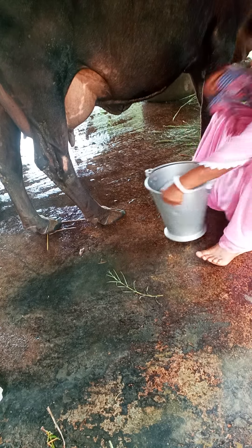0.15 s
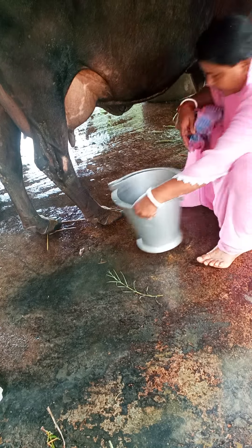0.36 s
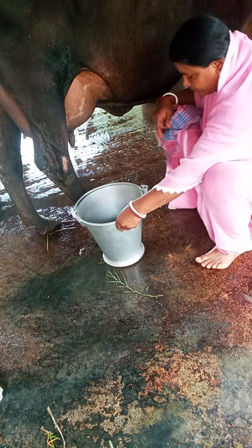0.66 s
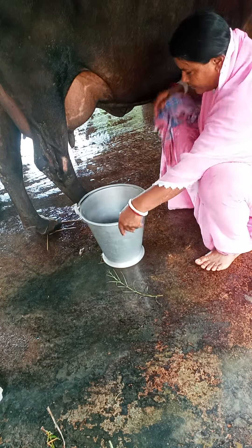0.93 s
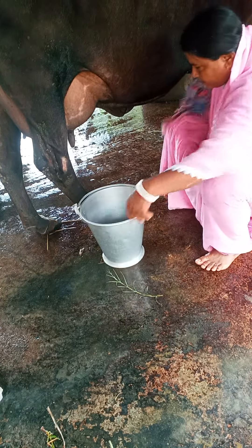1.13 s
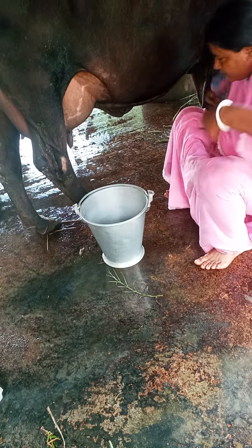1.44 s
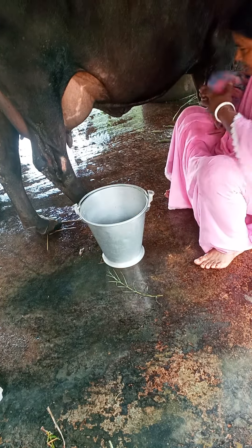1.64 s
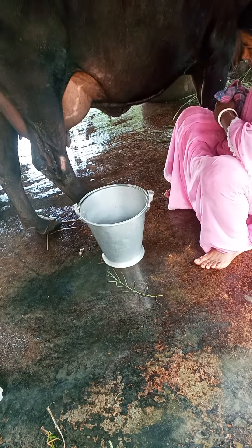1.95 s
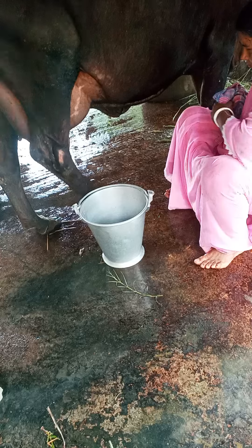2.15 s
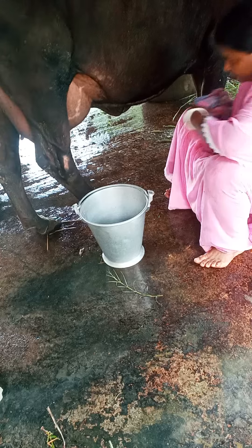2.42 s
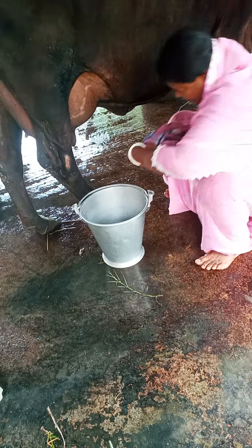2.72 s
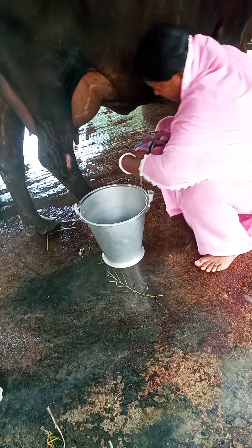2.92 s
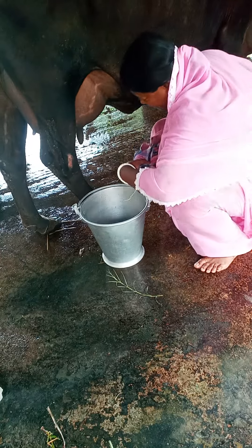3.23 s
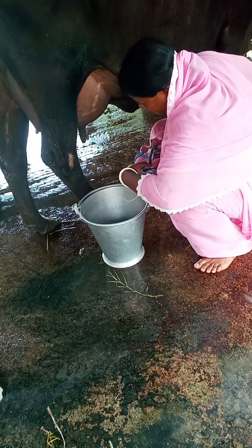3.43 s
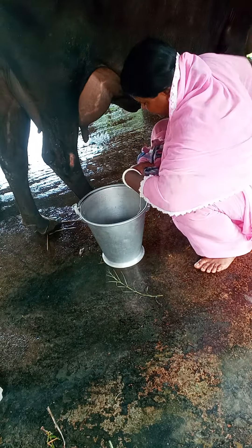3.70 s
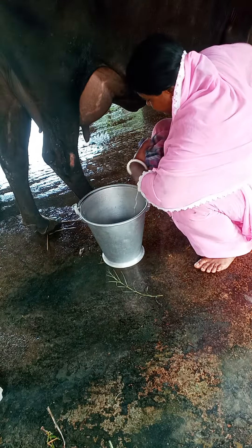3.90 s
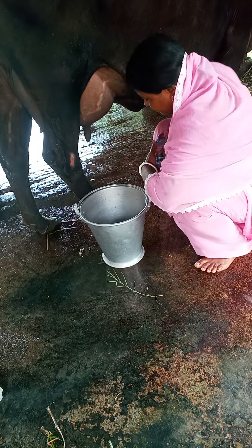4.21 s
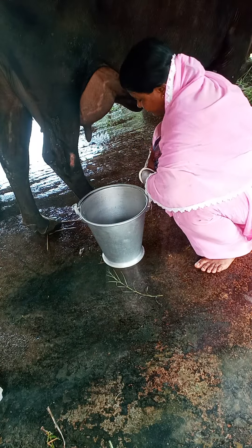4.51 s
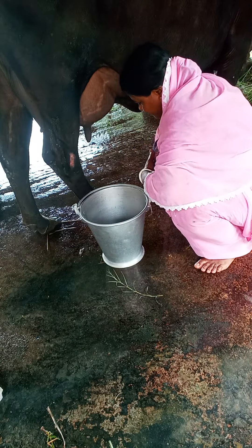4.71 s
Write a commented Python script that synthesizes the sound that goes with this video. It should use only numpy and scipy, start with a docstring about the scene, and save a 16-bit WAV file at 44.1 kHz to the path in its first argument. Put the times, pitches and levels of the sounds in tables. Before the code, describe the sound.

A quiet cattle shed with low, soft air and a short reverberation, heard close. From the start there are dull bumps and a cloth rustle; at about 0.2 s the bucket touches concrete lightly. Between 0.26 and 0.65 s something low and wooden, probably a stool, knocks and drags in gritty, juddering jerks. The loudest moment follows: hollow metallic clanks at 0.74 and 0.95 s, smaller ones at 1.07 and 1.17 s, with a booming roll and a small bright handle rattle. The bucket then rocks in quick, fading double taps until about 1.5 s. Until 2.8 s it is nearly silent: faint rustles, ticks, thin clinks like bangles, and muffled thumps. A soft bare footfall at 2.8 s leads to a second wooden scrape and knocks from 2.97 to 3.3 s. Soft pads follow near 3.4, 3.6 and 4.3 s, with shuffling, a small knock near 4.46 s and faint bumps to the end.

```python
"""The quiet air of a cattle shed, with soft bumps, rustles and small ticks, is heard first and throughout.
A metal milking bucket touches wet concrete, lands again and rocks to rest: struck plate modes and noise bursts.
Meanwhile something low and wooden, likely a stool, is dragged and knocked: stick-slip jerks drive resonances.
Bare feet then pad as damped noise, and the stool is dragged and knocked again as the milker shifts closer.
The shed walls answer each source briefly, by convolution with a decaying noise tail."""
import sys
import numpy as np
from scipy import signal
from scipy.fft import rfft, irfft, next_fast_len
from scipy.io import wavfile
from scipy.ndimage import map_coordinates

SR = 44100
rng = np.random.default_rng(int(sys.argv[2]) if len(sys.argv) > 2 else 0)


def digitize_waveform(pressure):
    """Quantize a signal to 16-bit integers and store it at the path in sys.argv[1].

    Rows of a 2-D input are taken as channels; values are limited to [-1, 1].
    """
    field = np.atleast_2d(pressure).T
    bounded = np.clip(field, -1, 1)
    quanta = np.round(bounded * 32767).astype(np.int16)
    wavfile.write(sys.argv[1], SR, quanta)


N = 214142  # length in samples

# bucket foot on floor: [t/s, bottom level/dB, bottom f/Hz, wall f/Hz, wall level/dB, clang level/dB]
BUCKET_LANDINGS = [(0.195, -30, 205, 854, -47, -51), (0.214, -28, 291, 810, -32, -51),
                   (0.736, -14, 340, 718, -14.5, -22.5), (0.9424, -14.5, 454.4, 774, -30.5, -23.5),
                   (0.956, -22.5, 497, 828, -30, -36), (1.065, -18.5, 318, 713, -33, -32),
                   (1.174, -29, 325, 840, -56, -39)]
# modes of the bucket's sheet metal: [f/Hz, relative level/dB, t60/s]
METAL_MODES = [(329, -3, .45), (366, -9, .55), (466, -6, .45), (730, -11, .3), (808, -9, .5), (846, -7, .3),
               (1019, -8, .3), (1101, 0, .33), (1292, -15, .28), (1398, -11, .3), (1672, -9, .26),
               (1920, -11, .24), (2050, -7, .2), (2175, -8, .26), (2351, -3, .25), (2620, -3, .19),
               (2778, -7, .2), (2820, -7, .2), (2915, -8, .18), (3298, -5, .22), (3597, -7, .19),
               (4032, -10, .15), (4258, -11, .13), (4605, -17, .18), (5098, -19, .18)]
# Spectra, unless noted: [f/Hz, relative level/dB]; the sound is then scaled to its own level.
# the metal's dense upper modes: [f/Hz, relative level/dB]
CLASH_SPECTRUM = [(600, -35), (950, -28), (1300, -15.5), (1800, -14.5), (2300, -4.5), (3200, -2),
                  (4300, -9.5), (6200, -17.5), (7700, -19), (8750, -12), (10400, -31), (12200, -32),
                  (13300, -29.5), (15800, -30)]
# dull boom of the bucket's bottom: [f/Hz, relative level/dB]
BOOM_SPECTRUM = [(50, -28), (150, -17.5), (250, -4), (330, 1), (430, -5), (600, -12), (850, -19),
                 (2000, -20), (6000, -56)]
# wire handle rattling in its ears: [f/Hz, relative level/dB]
WIRE_SPECTRUM = [(2000, -27), (4100, -1), (4600, 10), (5300, -5), (6000, -1), (7200, -11), (8800, -1),
                 (10500, -18), (15500, -12)]
# shoves that slide the stool: [start t/s, length/s, judder level/dB, grit level/dB, sand level/dB]
STOOL_SHOVES = [(0.385, 0.17, -33, -30, -47), (0.46, 0.097, -23, -24.5, -52.5), (0.617, .04, -28, -26, -48),
                (2.972, 0.053, -29, -37.5, -68), (3.01, 0.057, -22.5, -29.5, -70),
                (3.064, 0.052, -20, -26.5, -67), (3.118, 0.027, -24, -30.5, -57),
                (3.18, 0.018, -39, -30, -42), (3.212, 0.036, -35.5, -29.5, -42),
                (3.278, 0.015, -39, -32.5, -64)]
# heavy jolts as the legs catch and let go: [t/s, level/dB]
LEG_JOLTS = [(0.482, -21.5), (0.53, -33), (3.019, -19), (3.067, -24.5), (3.09, -17.5), (3.105, -19.5)]
# resonances of the stool: [f/Hz, width/Hz, relative level/dB]
WOOD_RESONANCES = [(165, 9.2, -18), (217.5, 15, -2.5), (270, 6.5, -11.5), (373.5, 23, 0.5),
                   (472.7, 15, -0.5), (528, 18, -1), (593, 11.7, 6), (717, 23, -5.5), (700, 38, -10.5),
                   (867, 38, -6.5), (927, 75, -5), (1090, 52, -31)]
# grit crushed under the legs: [f/Hz, relative level/dB]
GRIT_SPECTRUM = [(200, -19), (700, 14.5), (1100, 2.5), (1500, 7.5), (2400, 3.5), (3200, -2), (4000, -3.5),
                 (5200, -24), (7000, -28), (8800, -15.5), (10500, -61.5), (15500, -33)]
# legs rubbing on concrete: [f/Hz, relative level/dB]
RUB_SPECTRUM = [(40, -32), (110, -16.5), (200, 2.5), (330, -4.5), (560, 0.5), (1000, -3.5), (1800, -19), (5000, -59)]
# fine sand under the stool: [f/Hz, relative level/dB]
SAND_SPECTRUM = [(2500, -23), (5000, -3), (7000, -5.5), (8900, 3), (10500, -9), (13000, -14), (15500, 0)]
# sharp knocks of wood on the floor: [t/s, body level/dB, crack level/dB, tick level/dB]
WOOD_KNOCKS = [(0.2611, -41.5, -33.5, -38.5), (0.3586, -23.5, -21, -39.5), (0.6004, -31.5, -34.5, -45.5),
               (0.625, -28.5, -30.5, -39), (2.9675, -30.5, -62, -72), (3.1813, -39, -29, -40),
               (3.243, -40, -34.5, -47), (3.276, -36.5, -28.5, -41), (4.456, -50, -39, -41.5)]
# buzz of the stool's loose joints: [f/Hz, relative level/dB]
BUZZ_SPECTRUM = [(80, -15), (230, 5), (320, -15), (450, -9), (900, 4.5), (1500, -8), (4000, -89)]
# crack of a knock: [f/Hz, relative level/dB]
CRACK_SPECTRUM = [(200, -60), (800, 9.5), (1500, 6.5), (2300, 10.5), (3000, -1), (4000, -8), (5500, -18.5),
                  (9000, -37), (16000, -100)]
# bright tick of grit or straw: [f/Hz, relative level/dB]
TICK_SPECTRUM = [(1000, 10), (3000, 6.5), (5000, -2.5), (7000, -4), (8800, 6), (10500, -12), (13000, -12),
                 (15500, -7)]
# bare feet padding down on the concrete: [t/s, slap level/dB, heel level/dB]
FOOTSTEPS = [(2.799, -39, -47), (3.406, -31, -38.5), (3.589, -42, -43), (4.286, -38, -63),
             (4.383, -41, -43)]
# slap and heel of a bare foot: [f/Hz, relative level/dB]
SLAP_SPECTRUM = [(200, -20), (450, -1), (620, 0.5), (820, -2.5), (1100, -18), (2500, -18.5), (6000, -54)]
HEEL_SPECTRUM = [(40, -30), (110, -14), (250, 8.5), (420, -4.5), (900, -27), (3000, -61)]
# dull bumps of feet and hooves: [t/s, level/dB, f/Hz]
DULL_BUMPS = [(0.017, -40.5, 92), (0.152, -40.5, 80), (1.856, -47, 74.6), (1.997, -43, 86),
              (2.301, -45, 81), (3.864, -41.5, 66.4), (4.377, -44, 106), (4.691, -41, 209)]
# small ticks of straw and grit: [t/s, level/dB]
SMALL_TICKS = [(0.18, -48), (0.2367, -42), (0.47, -37), (0.497, -34), (0.5443, -38), (1.6512, -50.5),
               (2.1904, -54), (3.932, -46), (4.552, -50.5)]
# the milker shifts her weight: [start t/s, length/s, foot level/dB, cloth level/dB]
WEIGHT_SHIFTS = [(0, 0.11, -49, -51.5), (1.65, 0.047, -51.5, -52.5), (1.83, 0.21, -55, -56),
                 (2.17, 0.17, -58.5, -54), (2.4, 0.026, -59, -50), (2.64, 0.24, -49, -54.5),
                 (3.29, 0.16, -40, -56), (3.585, 0.059, -39, -48), (3.8, 0.26, -52, -52.5),
                 (4.28, .2, -46, -56), (4.68, 0.021, -44, -48.5), (4.79, .07, -46.5, -53)]
# sole shuffling on the floor: [f/Hz, relative level/dB]
SOLE_SPECTRUM = [(90, -4.5), (170, -3.5), (250, 0), (400, -3.5), (650, -6.5), (1100, -19), (2000, -22.5),
                 (4000, -62)]
# rustling cloth: [f/Hz, relative level/dB]
CLOTH_SPECTRUM = [(400, -63), (900, -4.5), (1500, 1), (2600, 1.5), (4000, -6), (6400, -20.5), (8800, -7.5),
                  (10300, -18), (12300, -20), (15500, -17)]
# faint bright clinks, likely bangles: [t/s, level/dB]
BANGLE_CLINKS = [(0.1351, -55), (1.7203, -57), (1.8138, -52.5), (1.899, -47.5), (2.542, -60)]
# clink of the bangles: [f/Hz, relative level/dB]
BANGLE_SPECTRUM = [(3000, -25), (6500, -13), (8000, -3.5), (9000, 7), (10500, -9.5), (13000, -8),
                   (15500, -2.5)]
# air of the shed: [f/Hz, relative level/dB]
AIR_SPECTRUM = [(25, -23), (45, -31), (70, 0.5), (110, 2.5), (160, -7), (300, -4.5), (900, -9), (3000, -15),
                (6000, -32), (7500, -30.5), (8900, -20), (10300, -36.5), (12500, -32), (15500, -25)]
# decay of the walls' answer: [f/Hz, t60/s]
SHED_DECAY = [(100, 0.2), (300, 0.22), (800, 0.21), (3000, 0.26), (8000, 0.27), (15000, 0.16)]

# low modes and thud relative to the bottom, high modes to the clang
THUD_DB, LOW_RING_DB, HIGH_RING_DB = -5.5, -4.5, -1.5
RIM_DELAY_S = .004  # from the boom to the clang
# even rocking, weaker each time, with two touches on each side
ROCK_START_S, ROCK_PERIOD_S, ROCK_DB, ROCK_LOSS_DB = 1.219, .0775, -30, 3
REBOUND_S, REBOUND_DB = .018, -1.5  # second touch, relative to the first
ROCK_BOTTOM_HZ, ROCK_PITCH_SCATTER = 326, 0.086  # median pitch; standard deviation of its natural log
ROCK_WALL_HZ, ROCK_WALL_DB, ROCK_CLANG_DB = 825, -13.5, -23.5  # levels relative to the bottom
ROLL_START_S, ROLL_LENGTH_S, ROLL_DB, ROLL_SAG_DB_PER_S = 0.95, 0.444, -29, 38.5
SHOVE_ATTACK_S, SHOVE_RELEASE_S = 0.011, 0.069  # rise time; time to fall 60 dB
SHIFT_ATTACK_S, SHIFT_RELEASE_S = 0.02, 0.29  # rise time; time to fall 60 dB
FAINT_TICK_DB, FAINT_TICK_SPREAD_DB = -59.5, 2  # centre; greatest departure either way
TOP_HZ = 15900  # band limit of the microphone


def bucket():
    """Modal impact: bottom and wall are pushed into a short boom, then the rim bites and the metal clangs."""
    out, t = np.zeros(N), time_axis(SR // 2)
    press = 1 - np.exp(-t / .002)
    for s, db, bottom_hz, wall_hz, wall_db, clang_db in BUCKET_LANDINGS + rocking(count=4):
        bottom = struck(thock(t, bottom_hz, t60=0.063) * press)
        wall = struck(thock(t, wall_hz, t60=0.066) * press)
        thud = struck(noise(BOOM_SPECTRUM, len(t)) * fade(t, 0.13) * press)
        add(out, s, amp(db) * bottom + amp(wall_db) * wall + amp(db + THUD_DB) * thud)
        # weight drives the low modes, hardness the high ones
        drive = [(330, db + LOW_RING_DB), (1100, clang_db + HIGH_RING_DB)]
        ring = np.zeros(len(t))
        for hz, level, t60 in METAL_MODES:
            strength = amp(along(drive, hz) + level + 0.9 * rng.normal())  # new at every contact
            phase = 2 * np.pi * hz * t + .5 * waver(t, rate=51)
            ring += strength * fade(t, t60) * np.sin(phase)
        clash = struck(noise(CLASH_SPECTRUM, len(t)) * fade(t, 0.13) * press)
        add(out, s + RIM_DELAY_S, ring * press + amp(clang_db) * clash)
    return out


def rocking(count):
    """Energy loss in rocking: ever weaker double contacts, as rows like the landings."""
    rows = []
    for k in range(count):
        for late, softer_db in [(0, 0), (REBOUND_S, REBOUND_DB)]:
            s = ROCK_START_S + k * ROCK_PERIOD_S + late
            db = ROCK_DB - k * ROCK_LOSS_DB + softer_db
            bottom_hz = ROCK_BOTTOM_HZ * np.exp(ROCK_PITCH_SCATTER * rng.normal())
            rows.append((s, db, bottom_hz, ROCK_WALL_HZ, db + ROCK_WALL_DB, db + ROCK_CLANG_DB))
    return rows


def roll():
    """Rolling excitation: the foot ring on the floor keeps the bottom booming, ever more quietly."""
    since = np.maximum(np.arange(N) / SR - ROLL_START_S, 0)
    sag = amp(ROLL_DB - ROLL_SAG_DB_PER_S * since)
    return sag * swell(ROLL_START_S, ROLL_LENGTH_S, attack=0.028, release=0.18) * noise(BOOM_SPECTRUM, N)


def handle():
    """Damped rattle: the wire handle sounds small and bright in its ears as the bucket tips."""
    out, t = np.zeros(N), time_axis(SR // 4)
    add(out, 1.029, amp(-43.5) * struck(noise(WIRE_SPECTRUM, len(t)) * fade(t, 0.085)))
    return out


def drag():
    """Stick-slip friction: the legs judder; each jerk shakes the wood and crushes a little grit."""
    judder, grit, _ = strokes(STOOL_SHOVES, SHOVE_ATTACK_S, SHOVE_RELEASE_S)
    jerks = slips(rate=260, scatter_db=2.2)
    t = time_axis(SR // 4)
    crush = signal.fftconvolve(jerks, fade(t, 0.04))[:N] * rng.standard_normal(N)
    body = wood(jerks * judder) / np.std(wood(jerks))
    rub = noise(RUB_SPECTRUM, N)
    out = body + judder * rub + grit * coloured(crush, GRIT_SPECTRUM)
    for s, db in LEG_JOLTS:
        add(out, s, amp(db) * struck(thock(t, hz=554, t60=0.028)))
    return out


def slips(rate, scatter_db):
    """Stick and slip: jerks of uneven size at uneven intervals."""
    interval_draws, size_draws = rng.standard_normal((2, 4000))
    at = (np.cumsum(np.exp(.45 * interval_draws)) * SR / rate).astype(int)
    sizes = amp(scatter_db * np.clip(size_draws, -2, 2))
    inside = at < N
    return np.bincount(at[inside], sizes[inside], N)


def wood(x):
    """Resonance: the force x drives parallel band-pass modes of alternating sign in the stool."""
    def response(f):
        total = 0
        for k, (centre, width, db) in enumerate(WOOD_RESONANCES):
            damping = 1j * f * width
            total = total + (-1) ** k * amp(db) * damping / (centre * centre - f * f + damping)
        return total
    return filtered(x, response)


def sand():
    """Granular friction: fine sand hisses unevenly under the stool with every shove."""
    _, _, creep = strokes(STOOL_SHOVES, SHOVE_ATTACK_S, SHOVE_RELEASE_S)
    return creep * amp(2.8 * wobble(300)) * noise(SAND_SPECTRUM, N)


def knocks():
    """Impulse response: a short blow rings the wood, cracks, ticks on grit and buzzes the loose joints."""
    out, t = np.zeros(N), time_axis(SR // 3)
    blow = t * np.exp(-t / 0.00016)
    seat = struck(wood(blow)) + struck(thock(t, hz=640, t60=0.0086))
    press = 1 - np.exp(-t / .0004)
    for s, body_db, crack_db, tick_db in WOOD_KNOCKS:
        buzz = struck(noise(BUZZ_SPECTRUM, len(t)) * fade(t, 0.21) * press)
        snap = press * (fade(t, .008) + amp(-5) * fade(t, .1))
        crack = struck(noise(CRACK_SPECTRUM, len(t)) * snap)
        tick = struck(noise(TICK_SPECTRUM, len(t)) * snap)
        add(out, s, amp(body_db) * (seat + buzz) + amp(crack_db) * crack + amp(tick_db) * tick)
    return out


def steps():
    """Soft impact: a bare sole presses gradually; its slap dies first and the low heel lingers."""
    out, t = np.zeros(N), time_axis(SR // 2)
    press = 1 - np.exp(-t / 0.0064)
    for s, slap_db, heel_db in FOOTSTEPS:
        slap = struck(noise(SLAP_SPECTRUM, len(t)) * fade(t, 0.17) * press)
        heel = struck(noise(HEEL_SPECTRUM, len(t)) * fade(t, 0.54) * press)
        add(out, s, amp(slap_db) * slap + amp(heel_db) * heel)
    return out


def bumps():
    """Heavy damping: feet and hooves give dull, brief swings of the floor."""
    out, t = np.zeros(N), time_axis(SR // 4)
    for s, db, hz in DULL_BUMPS:
        add(out, s, amp(db) * struck(thock(t, hz, t60=0.063)))
    return out


def ticks():
    """Light contact: each tick is a softly started, decaying burst of bright noise."""
    out, t = np.zeros(N), time_axis(SR // 4)
    press = 1 - np.exp(-t / .003)
    for s, db in SMALL_TICKS + faint_ticks(count=10):
        add(out, s, amp(db) * struck(noise(TICK_SPECTRUM, len(t)) * fade(t, 0.1) * press))
    return out


def faint_ticks(count):
    """Random arrivals: straw and bangles tick faintly, as rows [t/s, level/dB]."""
    return [(when * N / SR, FAINT_TICK_DB + FAINT_TICK_SPREAD_DB * (2 * size - 1))
            for when, size in rng.random((count, 2))]


def shuffle_and_rustle():
    """Friction noise: feet shuffle and cloth rustles, flickering, as the milker shifts her weight."""
    shuffle, rustle = strokes(WEIGHT_SHIFTS, SHIFT_ATTACK_S, SHIFT_RELEASE_S)
    flicker = amp(2.1 * wobble(70))
    return shuffle * noise(SOLE_SPECTRUM, N) + flicker * rustle * noise(CLOTH_SPECTRUM, N)


def bangles():
    """Dense high modes: bangles brush together in a thin clink, made of decaying noise."""
    out, t = np.zeros(N), time_axis(SR // 4)
    for s, db in BANGLE_CLINKS:
        add(out, s, amp(db) * struck(noise(BANGLE_SPECTRUM, len(t)) * fade(t, .17)))
    return out


def shed_air():
    """Broadband background: coloured noise whose level wavers gently."""
    return amp(-49.0 + 1.47 * wobble(6.95)) * noise(AIR_SPECTRUM, N)


def shed(x, wet_db):
    """Reverberation: the walls answer after 8 ms, and each frequency dies at its own speed."""
    hz, t, z = signal.stft(rng.standard_normal(SR * 3 // 4), SR, nperseg=256)
    decay = fade(t, along(SHED_DECAY, hz)[:, None])
    tail = signal.istft(z * decay, SR, nperseg=256)[1]
    tail = np.pad(tail / np.linalg.norm(tail), (int(.008 * SR), 0))
    return amp(wet_db) * signal.fftconvolve(x, tail)[:N]


def thock(t, hz, t60):
    """Damped oscillation: a decaying sine that starts softly."""
    return np.sin(2 * np.pi * hz * t) * fade(t, t60) * (1 - np.exp(-t * hz))


def fade(t, t60):
    """Exponential decay, 60 dB in t60."""
    return np.exp(-np.log(1000) * t / t60)


def swell(s, length, attack, release):
    """Envelope: rises from time s over attack, and decays once length has passed."""
    t = np.arange(N) / SR - s
    return np.clip(t / attack, 0, 1) * fade(np.maximum(t - length, 0), release)


def strokes(rows, attack, release):
    """Power addition: one gain curve per level column of [start, length, levels..] rows."""
    power = 0
    for s, length, *levels in rows:
        power = power + np.outer(amp(levels), swell(s, length, attack, release)) ** 2
    return np.sqrt(power)


def waver(t, rate):
    """Random drift: straight lines between random knots, rate knots a second."""
    knots = rng.standard_normal(100)
    return np.interp(t * rate, np.arange(len(knots)), knots)


def wobble(rate, size=N):
    """Random modulation: a smooth curve through rate knots a second."""
    knots = rng.standard_normal(int(size * rate / SR) + 4)
    return map_coordinates(knots, [np.arange(size) * rate / SR])


def noise(spectrum, size):
    """Coloured noise of rms 1."""
    return coloured(rng.standard_normal(size), spectrum)


def coloured(x, spectrum):
    """Spectral shaping: x weighted by [f/Hz, level/dB] points, at rms 1."""
    return unit(filtered(x, lambda hz: amp(along(spectrum, hz))))


def filtered(x, response):
    """Linear filtering: the spectrum of x times a complex response of frequency."""
    m = next_fast_len(len(x) + SR // 2)
    return irfft(rfft(x, m) * response(np.fft.rfftfreq(m, 1 / SR)), m)[:len(x)]


def along(points, hz):
    """Interpolation of [f/Hz, value] points on a logarithmic frequency axis."""
    f, v = np.transpose(points)
    return np.interp(np.log(hz + 1), np.log(f + 1), v)


def amp(db):
    """Decibels to amplitude ratio."""
    return 10 ** (np.asarray(db) / 20)


def unit(x):
    """Normalisation of x to rms 1."""
    return x / np.sqrt(np.mean(x ** 2) + 1e-20)


def struck(x):
    """Normalisation of an impact to rms 1 over its first 30 ms."""
    return x / np.sqrt(np.mean(x[:int(.03 * SR)] ** 2) + 1e-20)


def time_axis(size):
    """Sampling instants in seconds."""
    return np.arange(size) / SR


def add(track, s, sound):
    """Superposition: mix a sound into the track at time s."""
    part = track[max(round(s * SR), 0):][:len(sound)]
    part += sound[:len(part)]


def scene():
    """Superposition of direct sounds, wall answers and the air of the shed."""
    pail = bucket() + roll() + handle()
    stool = drag() + sand() + knocks()
    milker = stool + steps() + bumps() + ticks() + shuffle_and_rustle() + bangles()
    return (pail + shed(pail, wet_db=-8.5) + milker + shed(milker, wet_db=-8) + shed_air())[None]


def record(dry):
    """Band limitation: the microphone loses the deepest bass and keeps nothing above its limit."""
    low_cut = signal.sosfilt(signal.butter(4, 42, "highpass", fs=SR, output="sos"), dry[0])
    return filtered(low_cut, lambda hz: hz < TOP_HZ)[None]


dry = scene()
out = record(dry)
digitize_waveform(out)
```